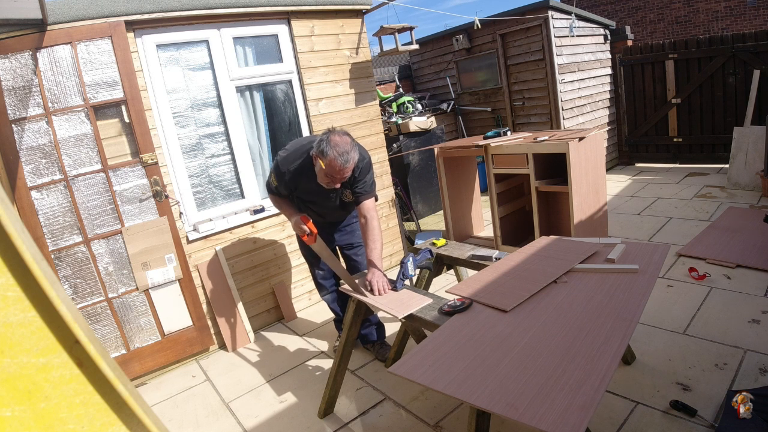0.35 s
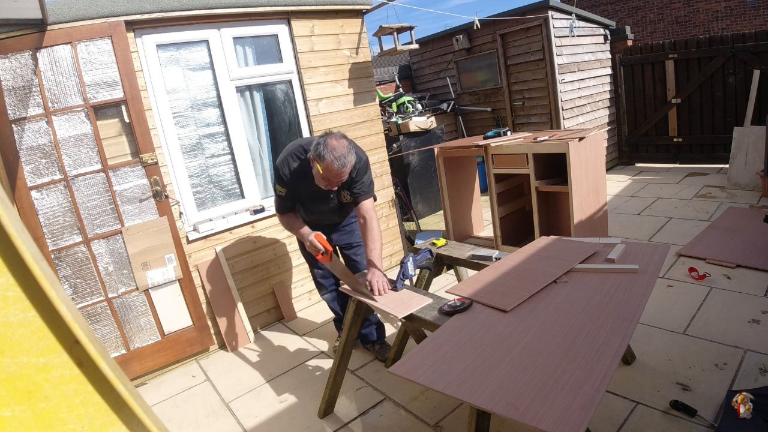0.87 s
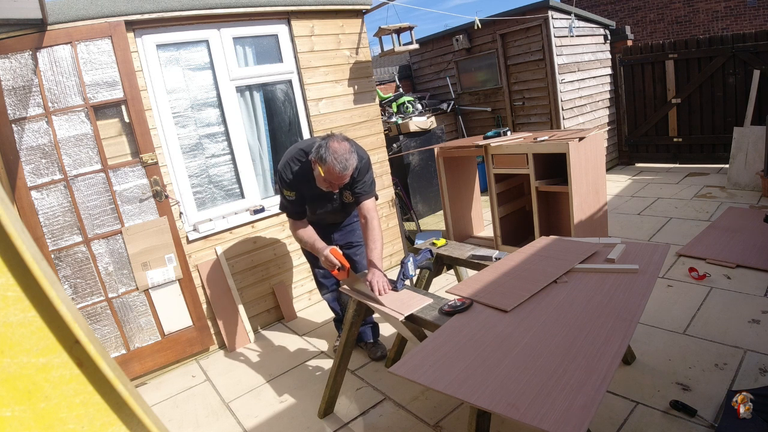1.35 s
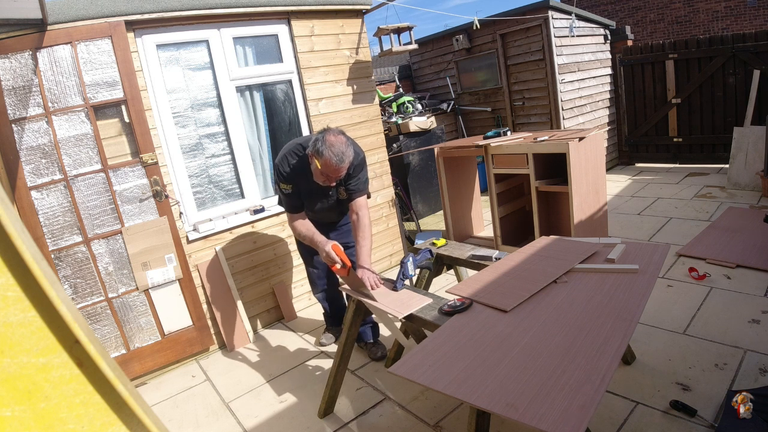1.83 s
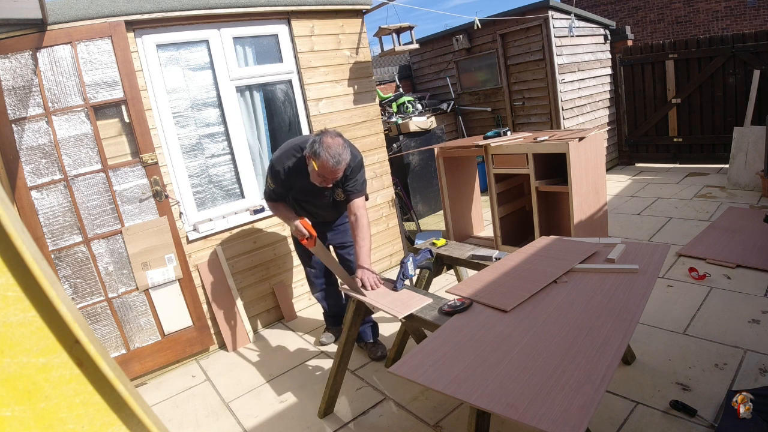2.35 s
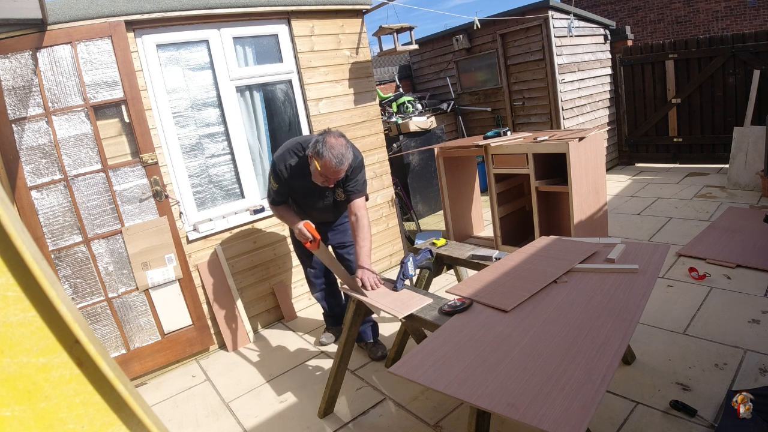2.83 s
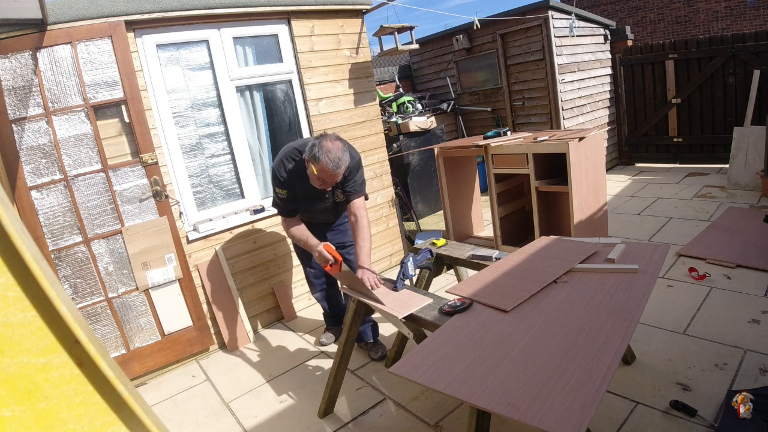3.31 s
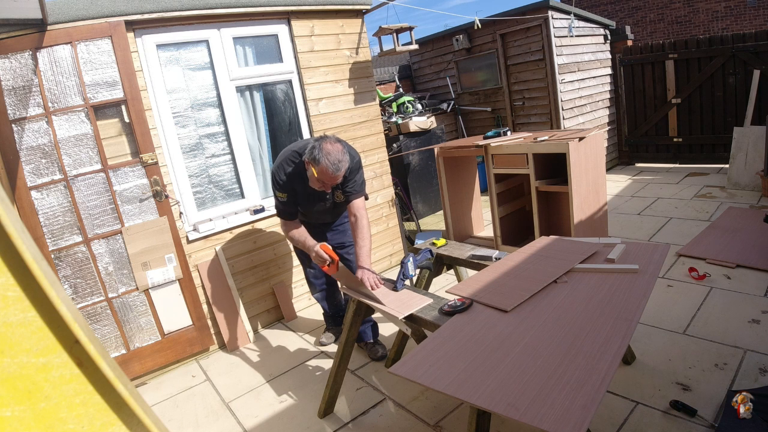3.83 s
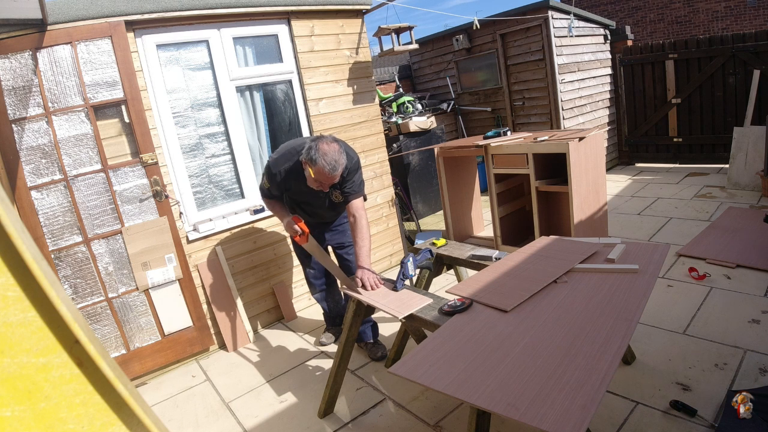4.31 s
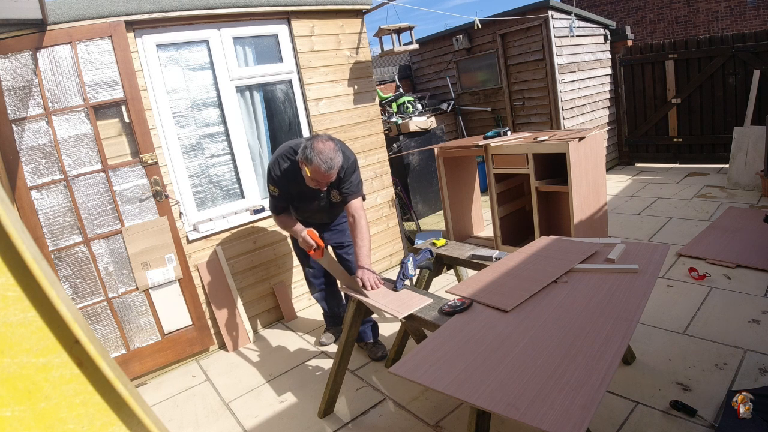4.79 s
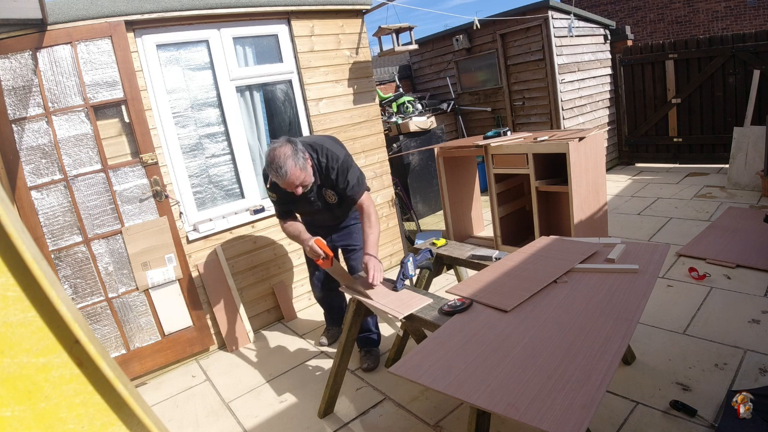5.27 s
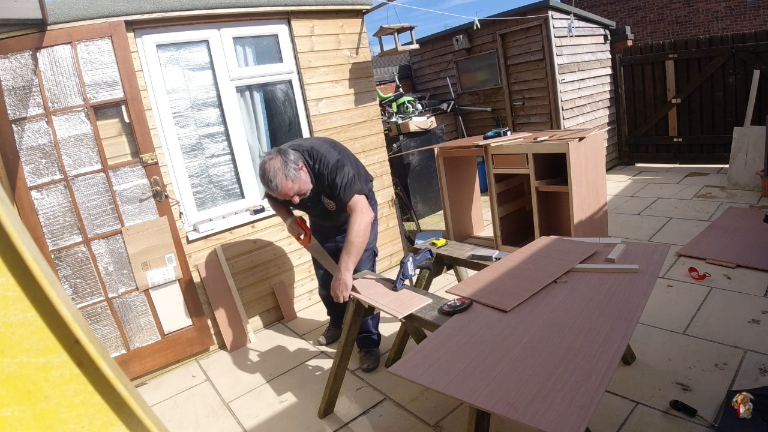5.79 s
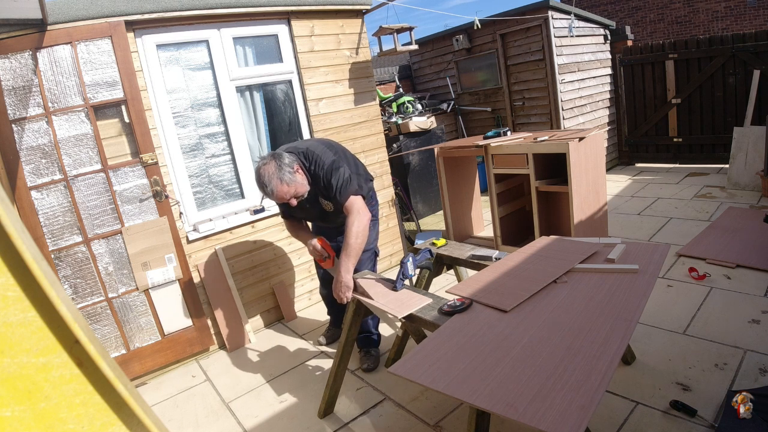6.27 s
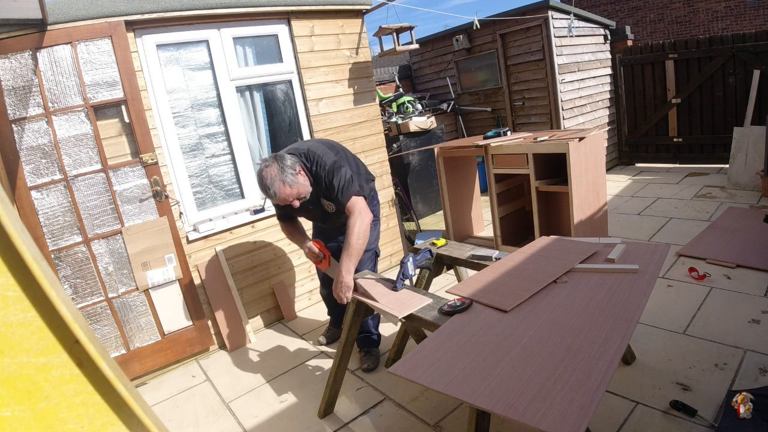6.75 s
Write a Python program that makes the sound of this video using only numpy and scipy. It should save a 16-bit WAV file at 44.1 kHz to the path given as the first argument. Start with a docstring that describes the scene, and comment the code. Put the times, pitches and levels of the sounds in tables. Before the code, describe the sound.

Close, dry back-and-forth hand sawing of a thin board on a trestle in a paved yard, briefly resting once, over faint engine hum.

```python
"""A hand saw close to the microphone cuts a thin board on a trestle in a paved yard, with one short rest.
Chance snaps of fibre, shaped by each push and pull, drive modes of board, blade and trestle and a dust hiss;
on the push the tooth rate is heard as an arching tone. Catches, thumps and squeaks mark single moments.
Sparse echoes stand for walls and paving; a far engine hums and light wind stirs the microphone."""
import sys
import numpy as np
from scipy import signal
from scipy.fft import rfft, irfft
from scipy.io import wavfile
from scipy.ndimage import uniform_filter1d

SR = 44100
rng = np.random.default_rng(int(sys.argv[2]) if len(sys.argv) > 2 else 0)


def transcribe(u):
    """Save the signal u as a 16-bit wav file named by the first command-line argument.

    u: samples, shape (n,) or (channels, n), limited to [-1, 1]; the rate is SR.
    q: integer samples, one column per channel.
    """
    v = np.clip(np.atleast_2d(u).T, -1, 1)
    q = np.round(v * 32767).astype(np.int16)
    wavfile.write(sys.argv[1], SR, q)


def magnitude_from_level(level_db):
    """Linear magnitude for a level in decibels (20 dB per decade)."""
    exponent = np.asarray(level_db, float) / 20
    return 10 ** exponent


N = 303849
TIME = np.arange(N) / SR

# Push strokes: start t/s, length/s, share of the stroke gone at top speed, board drive/dB,
# rise of pressure over the stroke/dB, top tooth rate before waver/Hz
PUSH_STROKES = [(-.2, 0.26, 0.76, -23.5, 3.5, 480), (0.472, .32, 0.45, -28, 5, 475),
                (1.156, 0.28, 0.59, -26, -4.5, 503), (2.36, 0.33, 0.51, -29.5, 12, 523),
                (3.061, 0.3, 0.5, -29.5, 0, 493), (3.712, 0.34, 0.56, -29.5, 1, 544),
                (4.382, .3, 0.59, -26.5, -1.5, 520), (5.065, 0.32, 0.56, -27.5, 6.5, 344),
                (5.95, 0.37, .55, -32, 4, 376), (6.64, 0.36, 0.46, -26, 15, 380)]
# Slow changes over the scene: t/s, tooth tone/dB, trestle on the push/dB, dust/dB
SLOW_CHANGES = [(0., 1.5, -0.5, 2), (1.2, 5.5, 1, -4), (2.5, 5.5, 3.5, 0), (3.5, 0.5, -2.5, 0.5),
                (4.4, 1, 3, -2.5), (5.5, -6, 0.5, -4.5), (6.1, -15, 2.5, -2.5), (6.89, -17, -10.5, -2.5)]
# Broad rasp of the board between its modes: f/Hz, relative density/dB
BOARD_SPECTRUM = [(140, -34), (230, -12.5), (677, -6), (781, -4.5), (870, -2.5), (1700, -12), (2210, -29),
                  (3740, -120)]
# Broad rasp of the blade between its modes: f/Hz, relative density/dB
BLADE_SPECTRUM = [(1000, -23.5), (1700, -5.5), (2100, -4.5), (2420, 0), (3280, -1), (4340, -14.5),
                  (7500, -37.5), (9750, -74), (16500, -120)]


def evened(x):
    """Scales to rms 1."""
    return x / np.sqrt(np.mean(x ** 2) + 1e-20)


def read(points, hz):
    """Reads a spectrum on a log-frequency axis."""
    f, value = np.transpose(points)
    return np.interp(np.log(hz + 1), np.log(f + 1), value)


def columns(rows, t):
    """Every column of a curve at the times t."""
    s, *rest = np.transpose(rows)
    return [np.interp(t, s, column) for column in rest]


def coloured(x, points):
    """Weights the spectrum of x by a curve in dB and scales to rms 1."""
    gain = magnitude_from_level(read(points, np.fft.rfftfreq(len(x), 1 / SR)))
    return evened(irfft(rfft(x) * gain, len(x)))


def drift(span_s, size=N):
    """Slow chance, rms 1: noise averaged twice over the span."""
    width = max(round(span_s * SR), 1)
    once = uniform_filter1d(rng.standard_normal(size), width)
    return evened(uniform_filter1d(once, width))


def resonate(x, hz, width):
    """Shifts the curve hz down to zero, smooths twice for steep skirts, and shifts back."""
    turn = np.exp(2j * np.pi * np.cumsum(hz * np.ones(len(x))) / SR)
    r = np.exp(-np.pi * width / SR)
    smooth = signal.lfilter([(1 - r) ** 2], [1, -2 * r, r * r], x / turn + 1e-18)
    return 2 * (turn * smooth).real


def stroke(start, length, crest):
    """Where a stroke lies, how far it has gone (0-1) and the arm's speed, an arch of height 1."""
    part = slice(max(round(start * SR), 0), min(round((start + length) * SR), N))
    gone = np.clip((TIME[part] - start) / length, 0, 1)
    bend = np.log(0.5) / np.log(crest)  # puts the top of the arch at crest
    return part, gone, np.sin(np.pi * gone ** bend) + 1e-3


def effort():
    """Board drive in dB, then trestle, blade and dust against it, from speed and progress of each stroke."""
    # Pull strokes: start t/s, length/s, share of the stroke gone at top speed, board drive/dB,
    # trestle drive against it/dB
    pulls = [(0.107, 0.38, 0.52, -36.5, -6.5), (0.772, 0.38, .62, -33, -11), (1.797, 0.16, 0.73, -41, -0.5),
             (1.977, 0.39, .45, -36, -5), (2.681, 0.39, 0.59, -35, -3), (3.373, 0.33, 0.56, -36, -4.5),
             (4.063, 0.33, 0.43, -32.5, -3), (4.721, 0.32, 0.61, -32.5, -7), (5.456, 0.47, 0.8, -36, -0.5),
             (6.331, .32, 0.47, -33, -11.5)]
    push_law, pull_law = 0.93, 1.18  # drive grows as speed to this power
    silent_db, contact_db = -75, -59.5  # blade off the wood; faint rub while it touches
    lifted_s = (1.47, 1.79)
    trestle_push_db, dip_db, dip_at, dip_width = 3, -29.5, 0.59, 0.31  # dip placed by share of the push
    blade_db, blade_fade_db = -5, -5  # against the board; fade by the end of a stroke
    dust_level_db, dust_fade_db, pull_dust_db = -32, -21.5, -2.5
    fade_from = 0.5  # share of the stroke

    board, trestle, late = np.full(N, float(silent_db)), np.zeros(N), np.zeros(N)
    _, trestle_change_db, dust_db = columns(SLOW_CHANGES, TIME)
    rest_times = np.repeat(lifted_s, 2) + [-0.03, 0, 0.014, 0.034]
    rest_db = np.interp(TIME, rest_times, [contact_db, silent_db, silent_db, contact_db])
    for start, length, crest, db, lean_db, _ in PUSH_STROKES:
        part, gone, speed = stroke(start, length, crest)
        board[part] = db + 20 * push_law * np.log10(speed) + lean_db * (gone - 0.5)
        # fast teeth in mid-push leave the trestle's low modes behind
        dip = dip_db * np.exp(-((gone - dip_at) / dip_width) ** 2)
        trestle[part] = trestle_push_db + trestle_change_db[part] + dip
        late[part] = gone
    for start, length, crest, db, trestle_db in pulls:
        part, gone, speed = stroke(start, length, crest)
        board[part] = db + 20 * pull_law * np.log10(speed)
        trestle[part] = trestle_db
        late[part] = gone
        dust_db[part] += pull_dust_db
    late = np.maximum(late - fade_from, 0) / (1 - fade_from)
    blade = blade_db + blade_fade_db * late
    dust = dust_level_db + dust_db + dust_fade_db * late
    return np.maximum(board, rest_db), trestle, blade, dust


def teeth(board_db):
    """The tone of teeth meeting the wood, its overtones, and the jolt each tooth gives the tearing."""
    # What each tooth's blow adds to the drive of the board: multiple of the tooth rate, level against the tone/dB
    overtones = [(2, -18), (3, -16.5)]
    # The tone swells where the board takes it up: t/s, added strength before waver and trim/dB, length/s
    swells = [(0.635, -38.5, 0.087), (0.676, -25, 0.029), (1.206, -40, 0.03), (1.339, -25.5, 0.016),
              (1.373, -28.5, 0.023), (2.565, -38, 0.011), (2.6, -22.5, 0.017), (3.263, -26.5, 0.024),
              (3.799, -37, 0.031), (3.909, -34, 0.017), (4.488, -30, 0.032), (5.245, -26, 0.039),
              (6.024, -36, 0.048)]
    slowest_per_s, tone_db = 150, -15.5  # teeth at the turn; tone against the board drive
    tone, blows, jolt = np.zeros(N), np.zeros(N), np.ones(N)
    strength = magnitude_from_level(board_db + tone_db + columns(SLOW_CHANGES, TIME)[0])
    for s, db, length in swells:
        strength += magnitude_from_level(db) * np.exp(-((TIME - s) / length) ** 2)
    for start, length, crest, _, _, top_per_s in PUSH_STROKES:
        part, _, speed = stroke(start, length, crest)
        rate = slowest_per_s + (top_per_s - slowest_per_s) * speed ** 1.3
        turns = np.cumsum(rate * (1 + 0.06 * drift(0.00502)[part])) / SR
        level = np.sqrt(2) * strength[part] * magnitude_from_level(2.94 * drift(0.0048)[part])
        tone[part] += level * np.cos(2 * np.pi * turns)
        for multiple, db in overtones:
            blows[part] += level * magnitude_from_level(db) * np.cos(2 * np.pi * multiple * turns)
        jolt[part] += 0.22 * np.cos(2 * np.pi * turns)
    return tone, blows, jolt


def fibres(per_s, spread_db):
    """Fibres snap one by one at chance moments, a few of them hard."""
    size = magnitude_from_level(spread_db * np.minimum(rng.exponential(1, N), 4))
    snaps = rng.random(N) < per_s / SR
    return evened(size * rng.standard_normal(N) * snaps)


def body(x, modes, shift_db, rasp=None, rasp_db=0):
    """The point of contact moves, so each mode is fed unevenly and wavers a little; keeps the rms of x."""
    ring = np.zeros(N)
    for hz, width, db, sink in modes:
        bent = hz * (1 - np.clip(sink, -0.1, 0.1) * TIME / TIME[-1] + 0.029 * drift(0.067))
        fed = x * magnitude_from_level(shift_db * drift(0.03))
        ring += magnitude_from_level(db) * resonate(fed, bent, max(width, hz / 25))
    if rasp:
        ring = evened(ring) + magnitude_from_level(rasp_db) * coloured(x, rasp)
    return evened(ring) * np.sqrt(np.mean(x ** 2))


def patchy(x, patch_db):
    """Brightness comes and goes in patches of time and frequency."""
    z = signal.stft(x, nperseg=512)[2]
    patches = uniform_filter1d(rng.standard_normal(z.shape), size=14, axis=0)
    patches = evened(uniform_filter1d(patches, size=4, axis=1))
    return evened(signal.istft(z * magnitude_from_level(patch_db * patches), nperseg=512)[1][:N])


def saw():
    """Tearing under the stroke feeds board, trestle, blade and a fine hiss of dust."""
    # Modes of the three bodies, each: f/Hz, least width/Hz (body() keeps it above f/25), relative level/dB,
    # share the pitch sinks by as the cut deepens (negative rises; held within 0.1 either way)
    trestle_modes = [(165.9, 27.3, 0.5, 0.041), (199.5, 60, -3, 0.0083), (240.3, 45.6, -4, -0.096)]
    board_modes = [(325.7, 53, 3.5, -0.17), (411.5, 162, -4, -0.057), (524, 82, 3, -0.088),
                   (683, 112, 4, 0.046), (787, 47, -29.5, .01), (933, 137, 1.5, 0.052),
                   (1012, 100, -9.5, 0.053), (1210, 100, 2, 0.025), (1316, 430, -17.5, 0.069),
                   (1510, 20, 0, -0.072)]
    blade_modes = [(1954, 70, 4.5, 0), (2348, 55, 3.5, 0.01), (2730, 240, 2.5, 0.037), (3247, 97, 3.5, .1),
                   (3513, 100, -4.5, 0.014), (3950, 120, -1, 0), (4590, 120, -10, 0.0048),
                   (5420, 140, -14.5, 0.018), (6110, 900, -22, 0.023)]
    # Spectrum of the dust hiss: f/Hz, relative density/dB
    dust_spectrum = [(4120, -28), (7000, -3.5), (8100, -11.5), (9290, -5), (13900, -7.5), (15800, -11)]
    board_db, trestle_db, blade_db, dust_db = effort()
    tone, blows, jolt = teeth(board_db)
    # the blade sticks and slips
    judder = magnitude_from_level(board_db + 0.57 * drift(0.009) + 1.5 * drift(0.027)) * jolt
    tear = fibres(per_s=9000, spread_db=1.5) * judder
    board = magnitude_from_level(-0.5) * body(tear + blows, board_modes, shift_db=3, rasp=BOARD_SPECTRUM, rasp_db=5)
    trestle = magnitude_from_level(-2) * body(tear * magnitude_from_level(trestle_db), trestle_modes, shift_db=0)
    blade = body(tear * magnitude_from_level(blade_db), blade_modes, shift_db=2.5, rasp=BLADE_SPECTRUM, rasp_db=5)
    blade *= magnitude_from_level(-0.67 + 1.8 * drift(0.041))
    # dust leaves the cut in soft puffs
    puffs_db = uniform_filter1d(board_db + dust_db, size=600) + 2.5 * drift(0.012)
    hiss = patchy(coloured(rng.standard_normal(N), dust_spectrum), patch_db=6)
    dust = magnitude_from_level(2 + puffs_db) * hiss
    return board + trestle + blade + dust + magnitude_from_level(-0.17) * tone


def background():
    """Town air as shaped noise, a far engine as two wavering tones, and slow wind pressure."""
    # Air of the yard at rest: f/Hz, relative density/dB
    air_spectrum = [(15, -29.5), (25, -4), (27, -13), (95, -4.5), (159, -13.5), (492, -8.5), (748, -24),
                    (911, -21.5), (4410, -52.5), (9000, -78), (11700, -97), (19800, -120)]
    # Engine before waver: t/s, firing tone/dB, tone at half its rate/dB
    engine_levels = [(0.0, -52.5, -72), (1.2, -65, -53.5), (1.7, -72.5, -67.5), (1.95, -53, -58),
                     (3.6, -55.5, -64), (4.3, -56, -53), (6.89, -53.5, -63)]
    # Wind on the microphone: t/s, level/dB
    wind_levels = [(0.0, -35), (0.4, -46), (1.2, -45), (1.65, -68.5), (1.9, -46.5), (2.9, -43), (3.4, -61),
                   (6.89, -63.5)]
    air_db, engine_hz = -61, 66.2  # both waver
    air = magnitude_from_level(air_db + 2.5 * drift(0.3)) * coloured(rng.standard_normal(N), air_spectrum)
    firing_db, half_db = columns(engine_levels, TIME)
    turns = np.cumsum(engine_hz * (1 + 0.017 * drift(0.086))) / SR
    engine = magnitude_from_level(firing_db + 0.5 * drift(0.05)) * np.cos(2 * np.pi * turns)
    engine += magnitude_from_level(half_db + 3.2 * drift(0.12)) * np.cos(np.pi * turns)
    wind = magnitude_from_level(columns(wind_levels, TIME)[0]) * drift(0.076)
    return air + np.sqrt(2) * engine + wind


def yard(x):
    """Sparse echoes of random sign from walls and paving, treble dying first."""
    # Decay of the yard: f/Hz, time to fall 60 dB/s
    decay = [(150, 0.35), (1000, 0.26), (4000, 0.22), (12000, 0.11)]
    taps = np.zeros(SR // 2)
    at = np.arange(300, SR // 2 - 20, 20)  # one echo in every 20 samples
    taps[at + rng.integers(0, 20, len(at))] = rng.choice([-1., 1.], len(at))
    hz, t, z = signal.stft(taps, SR, nperseg=256)
    t60 = np.maximum(read(decay, hz), 0.02)[:, None]
    tail = signal.istft(z * magnitude_from_level(-60 * t / t60), SR, nperseg=256)[1]
    return signal.fftconvolve(x, tail / np.linalg.norm(tail))[:N]


def catches():
    """The blade catches in the cut: a short scrape rings one patch of the board and one of the blade."""
    # t/s, peak level/dB, board ring f/Hz, blade against the board/dB, length/s (at least 0.004)
    snags = [(0.193, -25, 1210, -8.5, 0.011), (0.253, -20.5, 945, -15.5, 0.0093),
             (0.281, -30, 913, -24, 0.071), (0.489, -34.5, 940, -28, 0.089), (0.591, -16, 960, -12, 0.023),
             (0.79, -21, 1262, -6, 0.021), (1.873, -26.5, 908, -14.5, 0.022), (2.02, -34, 670, -24, 0.0073),
             (2.566, -14.5, 926, -24, 0.029), (2.802, -28.5, 805, -15, 0.003), (3.097, -31, 793, -25, 0.01),
             (3.403, -39, 830, -8, 0.04), (3.742, -32, 1140, -8, 0.008), (4.091, -47, 1110, -17, 0.024),
             (4.604, -24, 1190, -9, 0.033), (5.086, -38, 655, -11, 0.01), (5.432, -33.5, 850, -3, 0.015),
             (5.655, -36, 900, -14, 0.014), (6.332, -38.5, 690, -6, 0.013), (6.646, -37, 710, -12, 0.033),
             (6.683, -32, 780, -12, 0.025)]
    size, blade_hz = 8192, 3263
    out, t = np.zeros(N), np.arange(size) / SR
    for s, db, board_hz, blade_db, length in snags:
        envelope = np.minimum(t / 0.0027, 1) * np.exp(-(t / max(length, 0.004)) ** 2)
        scrape = rng.standard_normal(size) * envelope
        board = evened(resonate(scrape, board_hz, width=99))
        board += magnitude_from_level(-8.5) * coloured(scrape, BOARD_SPECTRUM)
        blade = evened(resonate(scrape, blade_hz, width=350))
        blade += magnitude_from_level(1.5) * coloured(scrape, BLADE_SPECTRUM)
        sound = (board + magnitude_from_level(blade_db) * blade) * signal.windows.tukey(size, 0.02)
        part = out[round(s * SR):][:size]
        part += (magnitude_from_level(db) * sound / abs(sound).max())[:len(part)]
    return out


def thumps():
    """The saw's weight lands on the trestle: a low ring that swells over a few cycles and dies."""
    # t/s, level before the swell and decay/dB, f/Hz, time to fall 60 dB/s
    landings = [(0.498, -33, 157, 0.2), (0.972, -25, 139, 0.2), (1.185, -19.5, 224, 0.17),
                (1.842, -24, 178.3, 0.32), (2.09, -37, 165, 0.14), (2.408, -54, 157, 0.28),
                (3.085, -20, 158.7, 0.16), (3.74, -15.5, 154, 0.1), (4.411, -27, 157, 0.17),
                (5.973, -29.5, 205, 0.22)]
    out, t = np.zeros(N), np.arange(SR // 2) / SR
    for s, db, hz, t60 in landings:
        swell = 1 - np.exp(-t / 0.026)
        out[round(s * SR):][:len(t)] += swell * magnitude_from_level(db - 60 * t / t60) * np.sin(2 * np.pi * hz * t)
    return out


def squeaks():
    """The blade squeaks as it turns round: thin tones that throb as steel sticks and slips."""
    # t/s, level before throb and fades/dB, f before waver/Hz, length/s
    chirps = [(1.428, -48, 2420, .028), (4.672, -48, 3500, .05), (4.678, -44, 1125, .065),
              (4.68, -42, 2550, .055), (4.69, -66, 5100, .04)]
    out = np.zeros(N)
    for s, db, hz, length in chirps:
        t = np.arange(round(length * SR)) / SR
        throb = 1 + 0.45 * np.cos(2 * np.pi * 46 * t)
        turns = np.cumsum(hz * (1 + 0.017 * drift(0.00076, len(t)))) / SR
        envelope = np.sqrt(2) * magnitude_from_level(db) * throb * signal.windows.tukey(len(t), 0.7)
        out[round(s * SR):][:len(t)] += envelope * np.sin(2 * np.pi * turns)
    return out


def scene():
    """The saw close by, its echoes and the yard."""
    near = saw() + catches() + thumps() + squeaks()
    return (near + magnitude_from_level(-11.5) * yard(near) + background())[None]


def low_pass(x):
    """Removes everything above the highest recorded frequency."""
    return signal.sosfilt(signal.butter(12, 15940, fs=SR, output="sos"), x)


def record(dry):
    """The microphone's amplifier rounds off the tallest peaks."""
    ceiling = magnitude_from_level(-10.5)
    finished = ceiling * np.tanh(dry / ceiling)
    return low_pass(finished)


dry = scene()
out = record(dry)
transcribe(out)
```